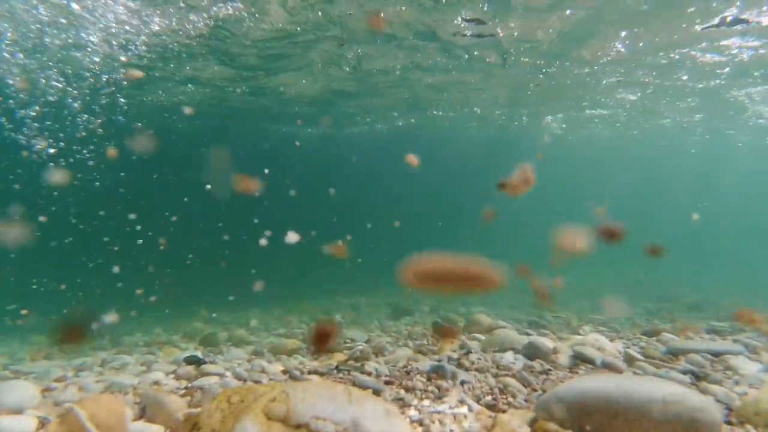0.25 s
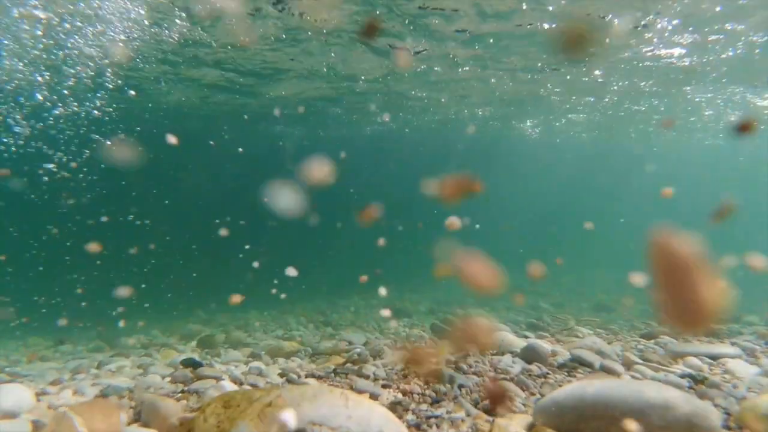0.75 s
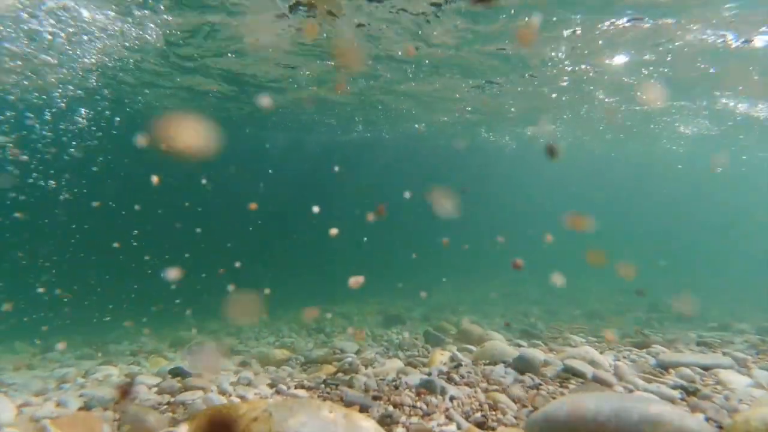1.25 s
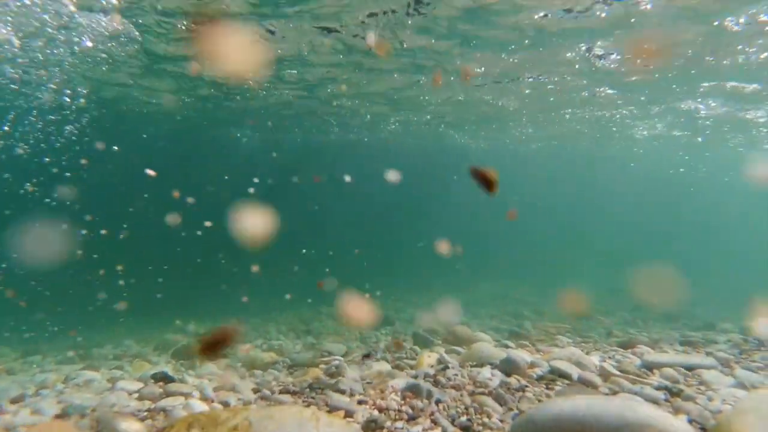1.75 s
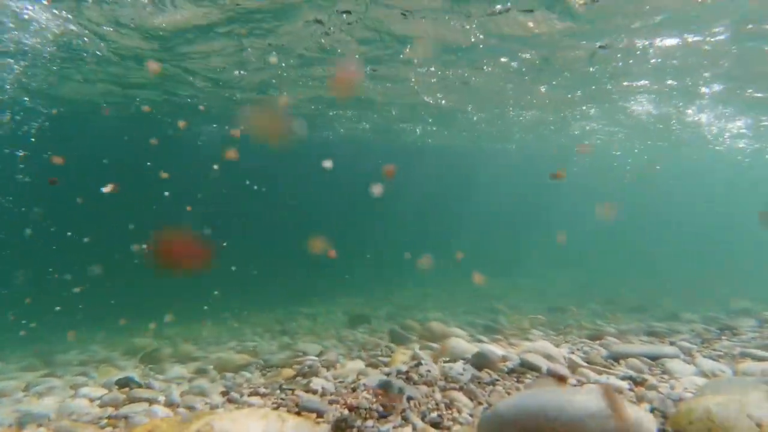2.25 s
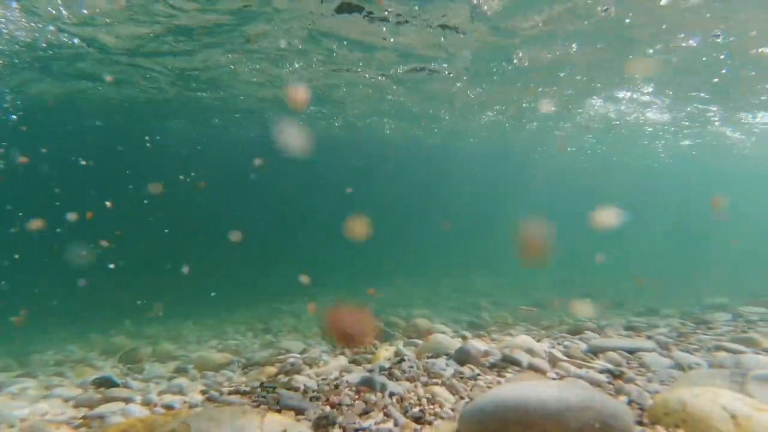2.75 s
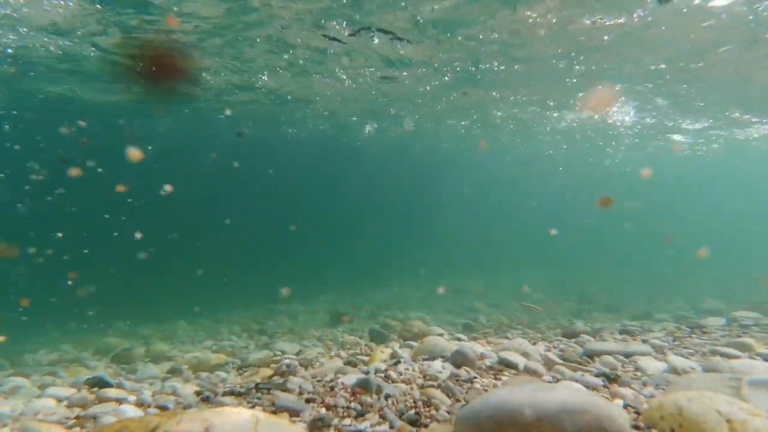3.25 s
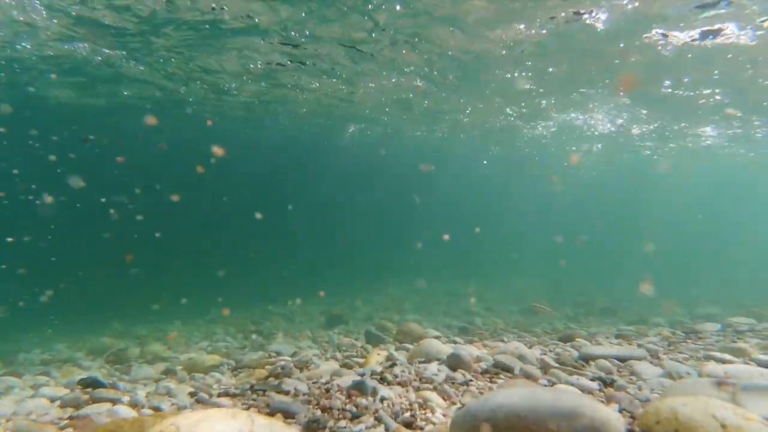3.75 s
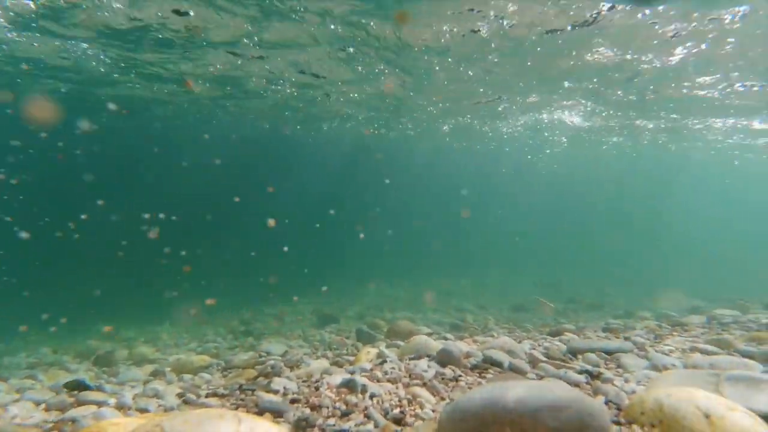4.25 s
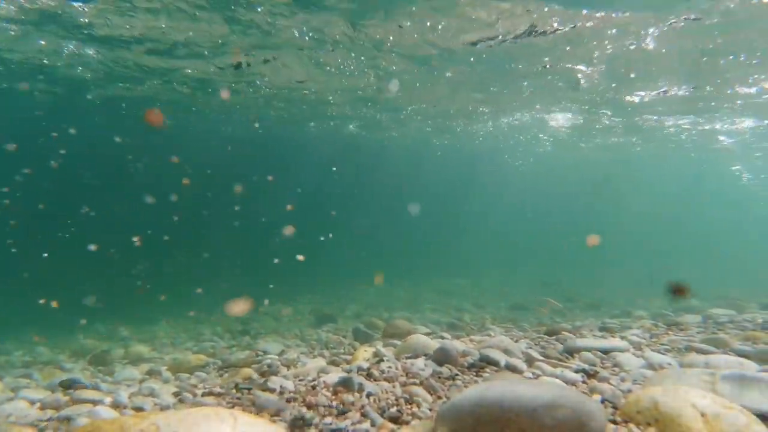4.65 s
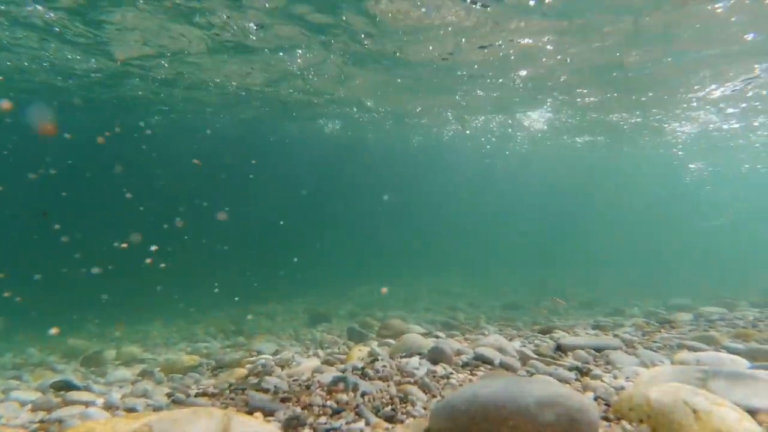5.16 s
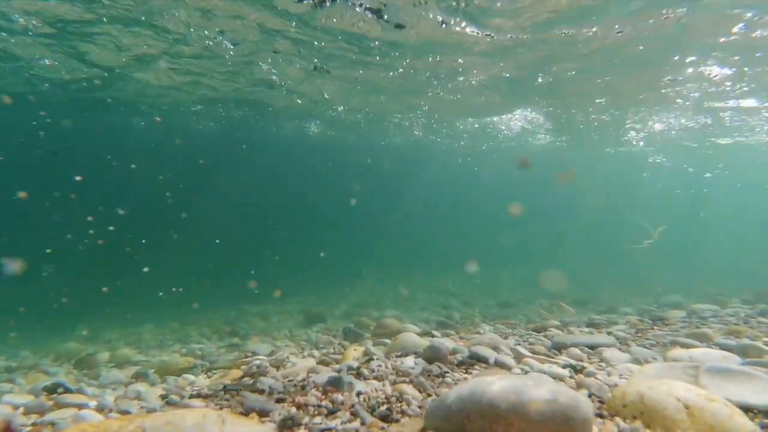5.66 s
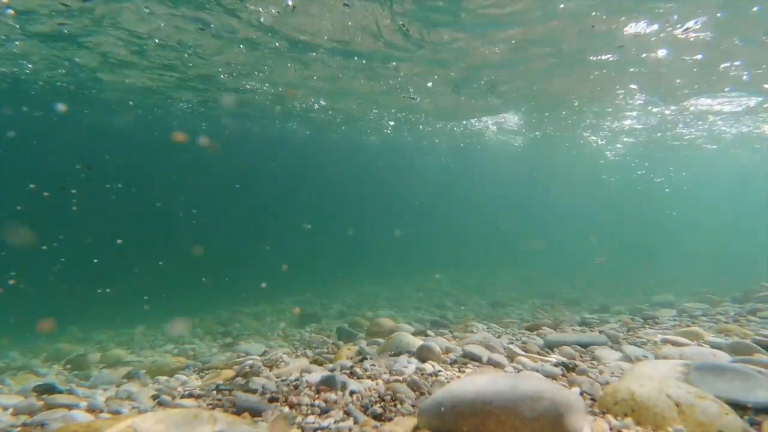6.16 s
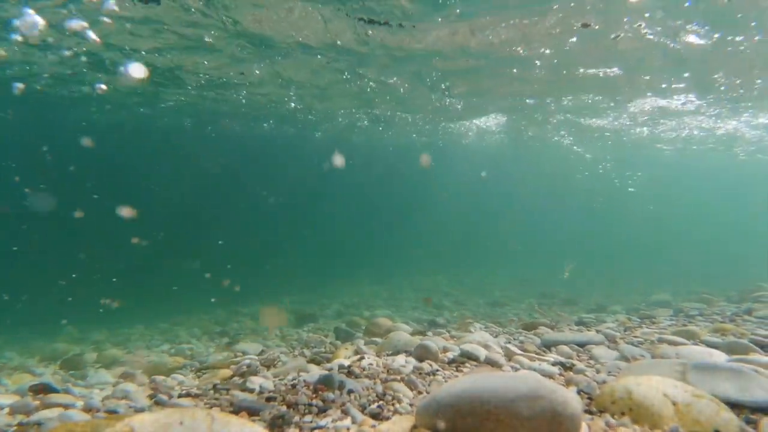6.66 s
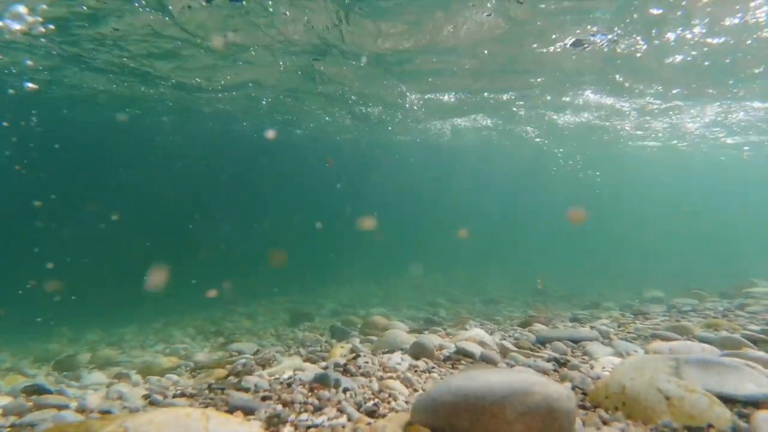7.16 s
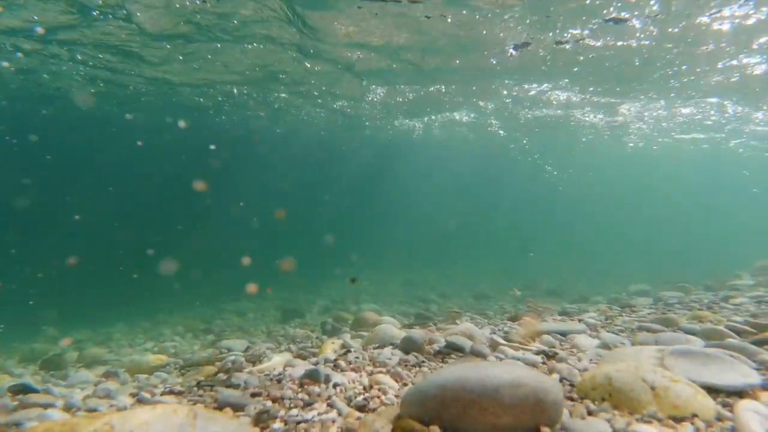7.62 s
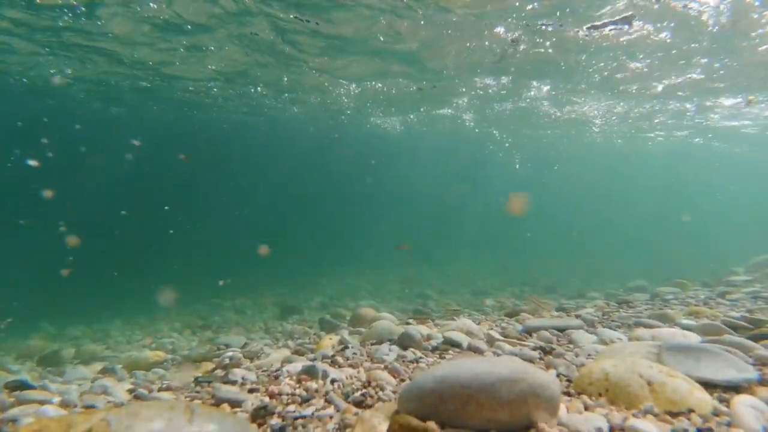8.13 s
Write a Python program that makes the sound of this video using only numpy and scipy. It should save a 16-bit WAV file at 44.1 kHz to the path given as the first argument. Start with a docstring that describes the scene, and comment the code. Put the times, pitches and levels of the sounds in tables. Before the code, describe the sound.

Underwater in a shallow stream, a dull low rush throbs and burbles while bubbles gulp and tiny grit ticks sharply close by.

```python
"""Under a shallow river

A camera in a watertight case sits just over the pebble bed. Air pockets throb as gliding low notes.
Churned water rushes dully: noise blended with masses of bubble chirps, which also burble and fizz.
Gravel clacks as short noise bursts, and grit ticks on the case as pings with a snap.
Single bubbles gulp as rising chirps. The case's resonances colour all but the throbs and the
side-to-side difference, noise whose changing level widens and narrows the stereo."""
import sys
import numpy as np
from scipy import signal
from scipy.fft import rfft, irfft, next_fast_len
from scipy.io import wavfile
from scipy.ndimage import uniform_filter1d

SR = 44100
rng = np.random.default_rng(int(sys.argv[2]) if len(sys.argv) > 2 else 0)


def to_wav(sig):
    """Store sig (one row per channel, or 1-D mono) as 16-bit WAV at the path in sys.argv[1].

    Samples outside -1..1 are clipped; the rate is SR.
    """
    pcm = np.clip(np.atleast_2d(sig), -1, 1) * 32767
    pcm = np.round(pcm).astype(np.int16)
    wavfile.write(sys.argv[1], SR, pcm.T)  # frames by channels


N = 369986
T = np.arange(N) / SR  # time of every sample, in seconds

# air pockets dragged under, each throbbing for a moment, with its pitch at half its length:
# (start [s], length [s], level [dB], pitch [Hz], glide [Hz/s])
THROBS = [(0, 0.1968, -20, 97.73, -52), (0.239, .125, -14.5, 85.9, -53), (.62, 0.069, -22, 89.64, -4.5),
          (0.827, .14, -18.5, 93.15, 71.5), (1.039, 0.13, -22, 85.97, 52.5), (1.34, 0.22, -23, 88.22, 35.5),
          (1.869, 0.2, -21, 86.28, -28.5), (2.276, 0.12, -23, 86.44, -31), (2.645, 0.2, -20, 89.06, -18),
          (2.891, 0.26, -20.5, 88.18, 15.5), (3.138, 0.1594, -19, 82.04, -46.5),
          (3.455, 0.2386, -24, 83.17, 69), (3.798, 0.091, -15.5, 84.8, -19), (3.907, 0.097, -18, 92, 38),
          (4.279, .25, -19.5, 87.7, 41), (4.533, .26, -15.5, 89.3, -55.5), (4.797, 0.22, -17, 85.13, 15),
          (5.038, 0.085, -24, 84.16, -1), (5.253, .14, -23.5, 84.9, -18), (5.686, 0.12, -18.5, 89.16, 4.5),
          (6.229, 0.13, -21, 81.6, -87), (6.362, 0.2344, -17, 82.57, -77),
          (6.685, 0.1526, -21, 72.97, -14.5), (6.962, 0.24, -18, 86.24, 40.5), (7.375, .21, -19, 87, -16),
          (7.69, 0.17, -30, 84.3, 0.5), (8.276, 0.14, -24.5, 88.3, -52)]
THROB_ATTACK_S, THROB_RELEASE_S = 0.012, 0.072
THROB_REST_HZ, THROB_REST_DB = 88.2, -35.5  # between the big pockets
THROB_WOBBLE = 0.03  # share of the pitch
# the smaller pockets around the main one: (frequency [Hz], relative level [dB])
POCKET_SPECTRUM = [(45, -16), (62, -11.5), (80, -6), (97, 7), (112, -6), (135, -18.5), (170, -26.5)]
POCKETS_DB, POCKETS_PER_THROB = -31, 0.37  # level, and dB of pockets per dB of throb

# surges of turbulence pressing on the case: (start [s], length [s], level [dB])
SURGES = [(0.2, 0.19, -27), (1.024, 0.19, -24.5), (2.392, 0.32, -25), (2.805, 0.28, -21.5),
          (3.347, 0.31, -24), (4.33, 0.14, -30), (5.452, 0.244, -26), (6.52, 0.13, -22.5),
          (7.55, 0.16, -27), (8.02, 0.21, -33)]
SURGE_ATTACK_S, SURGE_RELEASE_S = 0.096, 0.057
BUFFET_DB = -27  # between the surges
# gushes of big bubbles (churn) and small ones (burble) from upstream:
# (start [s], length [s], churn level [dB], burble level [dB])
GUSHES = [(0.622, 0.087, -36, -31.5), (1.37, .28, -33.5, -30), (1.94, 0.11, -25.5, -35),
          (2.202, 0.13, -44, -26), (2.401, 0.095, -25, -28), (2.72, .14, -35, -26.5),
          (3.032, 0.13, -32, -45.5), (3.275, 0.23, -28.5, -41.5), (3.569, 0.17, -59, -31),
          (3.99, 0.065, -40, -26.5), (4.36, 0.45, -27, -41), (5.45, 0.11, -25.5, -31.5),
          (5.709, 0.073, -45, -25), (6.09, 0.27, -26.5, -33.5), (6.491, .15, -23.5, -32),
          (7.026, 0.13, -25.5, -27), (7.337, 0.094, -25, -32.5), (8.105, 0.13, -29, -29)]
GUSH_ATTACK_S, GUSH_RELEASE_S = 0.24, 0.066
CHURN_DB, BURBLE_DB = -29.5, -31  # between the gushes
# smooth spectrum of turbulence on the case: (frequency [Hz], relative level [dB])
BUFFET_SPECTRUM = [(8, 4.5), (14, -10), (28, -9.5), (45, -6), (62, 4), (80, -3), (100, 0.5), (160, -39.5)]
# smooth spectrum of the big bubbles: (frequency [Hz], relative level [dB])
CHURN_SPECTRUM = [(70, -28), (105, -2.5), (135, 2), (200, -1.5), (270, -3.5), (340, -8), (500, -49)]
# smooth spectrum of the small bubbles: (frequency [Hz], relative level [dB])
BURBLE_SPECTRUM = [(200, -24.5), (300, -6), (380, 1), (480, -2.5), (600, -6.5), (720, -14.5), (900, -20),
                   (1200, -34), (2000, -61)]

# smooth spectrum of the finest bubbles: (frequency [Hz], relative level [dB])
FIZZ_SPECTRUM = [(500, 2), (900, -8.5), (1250, 1), (1600, -2.5), (2300, -3), (3000, -10.5), (4000, -15.5),
                 (5000, -15), (5600, -12), (6300, -6.5), (7000, -19), (8000, -31.5)]
# smooth spectrum of the brief swells within the fizz: (frequency [Hz], relative level [dB])
FROTH_SPECTRUM = [(650, -10), (850, 2), (1250, -4), (1700, -13)]
FROTH_DB = -59.5  # before its brief swells

# sideways rocking of the case: (frequency [Hz], relative level [dB])
ROCKING_SPECTRUM = [(8, -2.5), (20, 1.5), (43, -4), (65, 8), (88, 14.5), (125, 0), (170, -5.5), (260, -13),
                    (600, -54), (2000, -75.5), (6500, -65)]
ROCKING_DB = -33  # before its slow random drift
# low rumble and faint hiss that differ between the sides: (frequency [Hz], relative level [dB])
WIDTH_SPECTRUM = [(80, 2), (150, 12.5), (260, 9), (350, 3.5), (450, -4), (600, -12), (800, -25),
                  (1000, -34), (2400, -28), (3000, -62.5)]
# changing stereo width of the low rumble and faint hiss, wider under each throb:
# (time [s], level [dB])
WIDTH_LEVELS = [(0, -50), (.28, -42.5), (.55, -70.5), (1.3, -66), (1.95, -36), (2.25, -37), (3.2, -47),
                (4, -49.5), (4.55, -30.5), (5.2, -48), (5.7, -35), (7.1, -37.5), (7.65, -57.5),
                (8.39, -48.5)]
WIDTH_PER_THROB = 0.4  # dB of side-to-side difference per dB of throb

# pebbles knocking together close by: (time [s], peak level [dB], pitch [Hz])
CLACKS = [(.378, -41, 4600), (.558, -35.5, 1100), (.562, -35.5, 2200), (.565, -40, 4000), (.751, -34, 1770),
          (0.977, -39, 4300), (1.044, -42, 3600), (1.1325, -29.5, 2500), (1.19, -31, 4130),
          (1.202, -35, 1400), (1.938, -36, 4430), (2.121, -37, 1900), (2.122, -33, 3580),
          (2.327, -40, 3380), (2.815, -41, 4400), (3.07, -34, 4200), (3.088, -35, 5200), (3.133, -37, 3460),
          (3.677, -39, 3750), (4.248, -33, 3200), (4.275, -31.5, 4300), (4.427, -40, 4200),
          (5.433, -36.5, 4500), (5.871, -31, 4000), (6.07, -34, 5000), (6.155, -34, 3600),
          (6.359, -33.5, 3000), (6.867, -35, 4830), (7.228, -30.5, 2400), (7.333, -34, 3900),
          (7.512, -35.5, 4300), (7.72, -34.5, 2100)]
CLACK_ATTACK_S, CLACK_DECAY_S, CLACK_Q = 0.0008, 0.0033, 3.0
GRAVEL_LOW_HZ, GRAVEL_HIGH_HZ, GRAVEL_DB = 1730, 5050, -59.5  # the faint clacks further off

# grit striking the case: (time [s], peak level [dB])
TICKS = [(.379, -32), (.563, -32), (.734, -33.5), (1.069, -32.5), (1.1906, -32), (1.647, -29.5),
         (1.718, -35), (1.777, -31), (2.094, -31), (2.1117, -21.5), (2.122, -23.5), (2.2912, -31.5),
         (2.4125, -26.5), (2.725, -32.5), (2.8147, -22), (2.8452, -28), (2.943, -30.5), (3.085, -26),
         (3.277, -31.5), (3.464, -33), (3.677, -28), (3.925, -33), (3.997, -30.5), (4.275, -33.5),
         (4.346, -33.5), (4.6132, -21.5), (4.731, -33.5), (4.998, -30), (5.157, -28.5), (5.199, -30.5),
         (5.4983, -31), (5.716, -30), (5.8714, -22), (5.899, -24), (6.1063, -32), (6.117, -31),
         (6.176, -30.5), (6.7014, -29), (6.762, -29), (7.1017, -27.5), (7.431, -30.5), (7.698, -21),
         (7.711, -28.5), (7.8367, -25.5), (8.083, -29), (8.242, -29), (8.359, -31.5)]
WALL_HZ, WALL_SPREAD_HZ = 6133, 900  # the wall's ping, which depends on where it is struck
SNAP_S = 0.0011  # decay of a grain's broad snap
SNAP_BAND = signal.butter(2, [1500, 6500], "band", fs=SR)
ECHO_S, ECHO_SHARE = 0.0022, 0.41  # a click returns from a boundary close by
# flurries of sand swept against the case: (start [s], length [s], level [dB])
FLURRIES = [(2.258, 0.24, -58), (3.607, 0.52, -59), (4.776, 0.091, -51), (5.15, 0.09, -55),
            (5.426, 0.17, -57), (6.036, 0.17, -54), (7.68, 0.19, -55.5), (8.144, 0.2, -64)]
FLURRY_ATTACK_S, FLURRY_RELEASE_S = 0.036, 0.047
PATTER_DB = -56.5  # between the flurries

# single bubbles, from big gulps to small chirps:
# (start [s], length [s], starting pitch [Hz], level [dB], rise [share of the pitch])
GULPS = [(.665, 0.059, 435, -21.5, 0.32), (1.046, .025, 1183, -40, .15), (1.113, 0.054, 407, -23, 0.11),
         (1.343, .035, 550, -24.5, .1), (1.416, 0.031, 386, -19.5, 0.27), (1.622, 0.037, 385, -23.5, 0.19),
         (1.675, 0.031, 860, -39, 0.14), (1.728, 0.12, 136, -9, .1), (2.012, 0.034, 613, -32, 0.17),
         (2.173, .025, 946, -39, 0.23), (2.211, 0.025, 552, -19.5, 0.41), (2.251, 0.05, 737, -28.5, 0.15),
         (2.442, 0.025, 690, -29, 0.22), (2.496, 0.043, 321, -20, 0.29), (2.629, 0.033, 800, -34.5, 0.52),
         (2.644, 0.036, 388, -20, 0.22), (2.805, 0.064, 339, -20, 0.16), (2.864, 0.058, 666, -31.5, 0.3),
         (3.1, 0.054, 266, -21, 0.24), (3.103, .05, 568, -33, 0.41), (3.258, 0.034, 448, -18.5, 0.21),
         (3.311, 0.094, 124, -13, .15), (3.354, 0.061, 537, -24.5, 0.17), (3.755, 0.024, 437, -16.5, 0.23),
         (3.895, 0.053, 381, -26, 0.39), (3.985, 0.043, 452, -23.5, 0.31), (4.189, 0.077, 123, -14, 0.17),
         (4.279, .025, 900, -36, 0.33), (4.301, .055, 142, -6, 0.058), (4.322, 0.051, 551, -30, 0.17),
         (4.427, .008, 4160, -43, .02), (4.432, 0.033, 537, -26, 0.14), (4.474, 0.068, 215.5, -16.5, 0.21),
         (4.48, 0.07, 161, -14.5, 0.13), (4.582, 0.025, 815, -32, 0.16), (4.776, 0.0257, 1002, -37, 0.22),
         (4.825, 0.18, 110.9, -11, 0.4), (5.036, 0.045, 345, -22, 0.091), (5.142, 0.036, 654, -30, 0.11),
         (5.295, 0.03, 400, -17.5, .3), (5.343, 0.052, 732, -29.5, 0.15), (5.467, 0.072, 397, -19, 0.29),
         (5.517, 0.027, 518, -28, .2), (5.619, 0.03, 691, -32, .35), (5.719, 0.071, 354, -14, 0.44),
         (5.76, 0.019, 496, -20, 0.29), (5.879, 0.064, 337.7, -18.5, 0.14),
         (6.071, 0.0066, 5040, -32.5, .02), (6.12, 0.067, 167, -14, 0.058), (6.332, .03, 1200, -41, 0.22),
         (6.336, 0.053, 307, -18, .1), (6.506, 0.038, 485, -28.5, 0.26), (6.54, 0.029, 660, -25.5, 0.17),
         (7.004, 0.068, 112, -6.5, 0.13), (7.033, 0.054, 640, -24, 0.11),
         (7.122, 0.044, 193.6, -19.5, 0.13), (7.41, 0.057, 556, -27.5, 0.25),
         (7.616, 0.049, 183, -18, 0.14), (7.666, 0.021, 860, -34, 0.14), (7.953, .018, 686, -29, 0.38),
         (8.113, 0.043, 348, -16, 0.18), (8.117, 0.03, 525, -24, 0.2), (8.33, 0.022, 763, -32.5, 0.23)]
GULP_ROUGHNESS = 0.23  # share of a gulp's amplitude

# resonances and dips of the case: (frequency [Hz], width [Hz], gain [dB])
CASE_RESONANCES = [(153.3, 12, -11.5), (206.4, 41, 4.5), (236.2, 11, -5.5), (257, 25, 3.5),
                   (294.8, 19.2, -9.5), (342.6, 28.4, -8), (374.5, 30, 2.5), (415, 41, -4.5),
                   (438, 39, 6.5), (498, 41, -2.5), (566.4, 41, 2.5), (870, 39, -3), (886, 46, 5.5),
                   (1471, 120, -6), (1856, 97, -6.5), (2100, 67, 5.5), (2740, 47, -9), (4090, 260, -5.5),
                   (4400, 210, 3.5), (4974, 230, -7), (6265, 200, 3)]
HEADROOM, TOP_HZ = 0.77, 7000  # amplitude the peaks are rounded towards; cut-off of the camera


def undb(db):
    """Turn decibels into a gain."""
    return 10 ** (np.asarray(db) / 20)


def unit(x):
    """Scale to an average strength (rms) of 1."""
    return x / np.sqrt(np.mean(x ** 2))


def colour(x, spectrum):
    """Filter by (frequency, dB) points joined on a log-frequency axis, fading beyond both ends."""
    hz, db = np.transpose(spectrum)
    size = next_fast_len(N, True)
    f = np.fft.rfftfreq(size, 1 / SR) + 1e-3  # never zero, so its log exists
    outside = np.minimum(f / hz[0], 1) * np.minimum(hz[-1] / f, 1) ** 4
    gain = undb(np.interp(np.log(f), np.log(hz), db))
    return irfft(rfft(x, size) * outside * gain, size)[..., :N]


def noise(spectrum):
    """Make steady coloured noise of rms 1."""
    return unit(colour(rng.standard_normal(N), spectrum))


def walk(rate):
    """Wander at random: levels held for 1 / rate seconds, smoothed twice, rms 1."""
    k = int(SR / rate)
    steps = np.repeat(rng.standard_normal(N // k + 1), k)
    smooth = uniform_filter1d(uniform_filter1d(steps, k), k)
    return unit(smooth[:N])


def add(out, s, sound):
    """Mix a short sound in at time s."""
    i = int(np.clip(s * SR, 0, N - 1))
    out[i:i + len(sound)] += sound[:N - i]


def swell(start, length, attack_s, release_s):
    """Rise, hold and fall, 0 to 1: half-way up at the start and half-way down after `length`."""
    rise = 0.5 + (T - start) / attack_s
    fall = 0.5 + (start + length - T) / release_s
    return np.clip(np.minimum(rise, fall), 0, 1)


def swelling(rest_db, events, attack_s, release_s):
    """Gain of a steady bed with (start, length, dB) swells on top; their powers add."""
    power = undb(rest_db) ** 2
    for s, length, db in events:
        power = power + (undb(db) * swell(s, length, attack_s, release_s)) ** 2
    return np.sqrt(power)


def throb(strength):
    """Big air pockets pulse: the largest gives an unsteady, gliding note; smaller ones blur it."""
    pitch = np.full(N, float(THROB_REST_HZ))
    for s, length, _, hz, glide in THROBS:
        own = hz + glide * (T - s - length / 2)
        pitch = pitch + swell(s, length, THROB_ATTACK_S, THROB_RELEASE_S) * (own - pitch)
    phase = 2 * np.pi * np.cumsum(pitch * (1 + THROB_WOBBLE * walk(35))) / SR
    note = strength * unit(np.sin(phase))
    # a power below 1 makes the smaller pockets swell less
    smaller = unit(strength ** POCKETS_PER_THROB) * noise(POCKET_SPECTRUM)
    return note + undb(POCKETS_DB) * smaller


def bubble(hz, cycles, glide, onset, fade_db):
    """A ringing bubble swells over `onset` cycles, fades, and rises in pitch as it nears the surface."""
    turn = np.arange(int(cycles * SR / hz)) * hz / SR
    age = turn / cycles  # 0 to 1
    attack = 1 - np.exp(-(turn / onset) ** 2)
    fade = undb(-fade_db * age ** 1.5) * (1 - age ** 8)
    return attack * fade * np.sin(2 * np.pi * turn * (1 + glide * age / 2))


def cloud(low_hz, high_hz, cycles, glide, spread_db, climb, count):
    """Many trains of three bubbles, each smaller and higher; `spread_db` makes a few stand out as close."""
    out = np.zeros(N)
    for when, size, near in rng.random((count, 3)):
        s = when * N / SR
        hz = low_hz * (high_hz / low_hz) ** size
        closeness = undb(-spread_db * np.log(0.015 + near))
        for ring, wait, strength in rng.random((3, 3)):
            sound = bubble(hz, cycles * (0.5 + ring), glide, onset=1.62, fade_db=23)
            add(out, s, strength * closeness * sound)
            s += wait * cycles / hz
            hz *= 1 + climb * wait
    return unit(out)


def rush(churning, burbling):
    """Turbulence buffets the case; upstream, masses of bubbles blur into noise."""
    big = cloud(100.06, 291.4, cycles=9, glide=0.11, spread_db=0.5, climb=0.2, count=300)
    small = cloud(271.16, 1095.0, cycles=16, glide=0.17, spread_db=0.0, climb=0.172, count=850)
    big, small = colour(big, CHURN_SPECTRUM), colour(small, BURBLE_SPECTRUM)
    pressing = swelling(BUFFET_DB, SURGES, SURGE_ATTACK_S, SURGE_RELEASE_S)
    buffet = pressing * noise(BUFFET_SPECTRUM)
    churn = churning * unit(unit(big) + 1.21 * noise(CHURN_SPECTRUM))
    burble = burbling * unit(unit(small) + 0.77 * noise(BURBLE_SPECTRUM))
    flicker = undb(0.76 * walk(20))
    return buffet + churn + burble * flicker


def fizz(burbling):
    """The finest bubbles: a wash of noise and soft chirps that surges with the burble, and frothy swells."""
    surge = (burbling / burbling.mean()) ** 0.4 * undb(1.0 * walk(22))
    pops = cloud(700, 2400, cycles=9, glide=0.25, spread_db=1.7, climb=0.15, count=1100)
    pops = unit(colour(pops, FIZZ_SPECTRUM))
    wash = undb(-53.5) * noise(FIZZ_SPECTRUM) + undb(-53) * pops
    froth = noise(FROTH_SPECTRUM) * undb(6 * np.tanh(walk(32)))
    return surge * wash + undb(FROTH_DB) * froth


def side_difference(throbbing):
    """The case rocks sideways, and a low rumble and faint hiss change in width, wider under each throb."""
    rocking = undb(ROCKING_DB) * noise(ROCKING_SPECTRUM) * undb(1.6 * walk(5))
    width = undb(np.interp(T, *np.transpose(WIDTH_LEVELS))) * unit(throbbing) ** WIDTH_PER_THROB
    rumble_and_hiss = width * noise(WIDTH_SPECTRUM) * undb(3.4 * walk(24))
    return rocking + rumble_and_hiss


def clack(hz):
    """Two small stones meet and scrape: a rough burst of a few milliseconds around their pitch."""
    t = T[:SR // 50]
    envelope = (1 - np.exp(-t / CLACK_ATTACK_S)) * np.exp(-t / CLACK_DECAY_S)
    scrape = rng.standard_normal(len(t)) * envelope
    band = signal.iirpeak(hz, CLACK_Q, fs=SR)
    y = signal.lfilter(*band, signal.lfilter(*band, scrape))
    return y / np.abs(y).max()


def gravel():
    """Gravel shifts on the bed: clusters of faint clacks of all sizes, and a few close ones."""
    far, near = np.zeros(N), np.zeros(N)
    for when, force, size in rng.random((1000, 3)):
        hz = GRAVEL_LOW_HZ * (GRAVEL_HIGH_HZ / GRAVEL_LOW_HZ) ** size
        loudness = undb(-5 * np.log(1 / 16 + force))  # most faint, a few strong
        add(far, when * N / SR, loudness * clack(hz))
    for s, db, hz in CLACKS:
        add(near, s, undb(db) * clack(hz))
    clusters = undb(4 * np.tanh(walk(16)))
    return undb(GRAVEL_DB) * unit(far * clusters) + near


def tick(hz, snap, ring_s, rattle):
    """A grain strikes the case: a short ping and a broad snap, a quick echo, a faint rattle in the shell."""
    t = T[:SR // 50]
    crack, shell = rng.standard_normal((2, len(t)))
    ping = (1 - np.exp(-(t / 0.00053) ** 2)) * np.exp(-t / ring_s) * np.sin(2 * np.pi * hz * t)
    crack = signal.lfilter(*SNAP_BAND, crack * np.exp(-t / SNAP_S))
    echoes = rattle * shell * np.exp(-t / 0.0062)
    echoes[0] = 1  # the strike itself
    echoes[int(ECHO_S * SR)] = ECHO_SHARE
    y = signal.fftconvolve(unit(ping) + snap * unit(crack), echoes)[:len(t)]
    return y / np.abs(y).max()


def grit():
    """Sand patters on the stiff wall in flurries, with lulls; now and then a bigger grain clicks."""
    patter, clicks = np.zeros(N), np.zeros(N)
    for when, force, place in rng.random((1200, 3)):
        hz = WALL_HZ + WALL_SPREAD_HZ * (place - 0.5)
        loudness = undb(-6.8 * np.log(1 / 30 + force))  # most faint, a few strong
        grain = tick(hz, snap=0.24, ring_s=0.00035, rattle=0.053)
        add(patter, when * N / SR, loudness * grain)
    for s, db in TICKS:
        hz = WALL_HZ + WALL_SPREAD_HZ * (rng.random() - 0.5) / 2
        add(clicks, s, undb(db) * tick(hz, snap=0.26, ring_s=0.00029, rattle=0.05))
    lulls = undb(2.5 * np.tanh(walk(14)))
    flurry = swelling(PATTER_DB, FLURRIES, FLURRY_ATTACK_S, FLURRY_RELEASE_S)
    return flurry * unit(patter * lulls) + clicks


def gulps():
    """Single bubbles break away, each a rising chirp whose loudness wavers as the bubble deforms."""
    out = np.zeros(N)
    for s, length, hz, db, rise in GULPS:
        add(out, s, undb(db) * bubble(hz, length * hz, rise, onset=2.58, fade_db=15))
    return out * (1 + GULP_ROUGHNESS * walk(130))


def case(x):
    """The shell strengthens some pitches and weakens others, as a filter that never rings ahead of a sound."""
    size = 2 ** 13
    f = np.fft.rfftfreq(size, 1 / SR)
    db = np.zeros(len(f))
    for hz, width, gain_db in CASE_RESONANCES:
        db += gain_db * np.exp(-2 * ((f - hz) / width) ** 2)
    # folding the cepstrum (spectrum of the log gain) forward in time gives minimum phase
    cepstrum = irfft(np.log(undb(db)))
    cepstrum[1:size // 2] *= 2
    cepstrum[size // 2 + 1:] = 0
    response = irfft(np.exp(rfft(cepstrum)))
    return signal.fftconvolve(x, response)[:N]


def scene():
    """Both sides share one middle signal; the side difference is added to one and taken from the other."""
    pockets = [row[:3] for row in THROBS]
    churns = [(s, length, db) for s, length, db, _ in GUSHES]
    burbles = [(s, length, db) for s, length, _, db in GUSHES]
    throbbing = swelling(THROB_REST_DB, pockets, THROB_ATTACK_S, THROB_RELEASE_S)
    churning = swelling(CHURN_DB, churns, GUSH_ATTACK_S, GUSH_RELEASE_S)
    burbling = swelling(BURBLE_DB, burbles, GUSH_ATTACK_S, GUSH_RELEASE_S)
    water = rush(churning, burbling) + fizz(burbling) + gulps()
    stones = gravel() + grit()
    mid = case(water + stones) + throb(throbbing)
    side = side_difference(throbbing)
    return np.array([mid + side, mid - side])


def record(dry):
    """The camera rounds the loudest peaks, and a steep filter lets little through above the cut-off."""
    rounded = HEADROOM * np.tanh(dry / HEADROOM)
    # 0.5 dB of ripple below the cut-off, at least 45 dB of loss well above it
    cutoff = signal.ellip(7, 0.5, 45, TOP_HZ, fs=SR, output="sos")
    return signal.sosfilt(cutoff, rounded)


dry = scene()
out = record(dry)
to_wav(out)
```